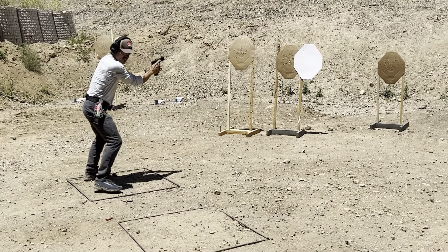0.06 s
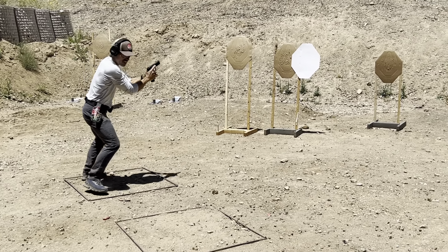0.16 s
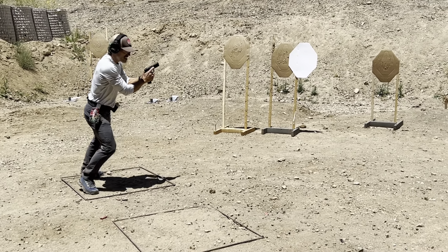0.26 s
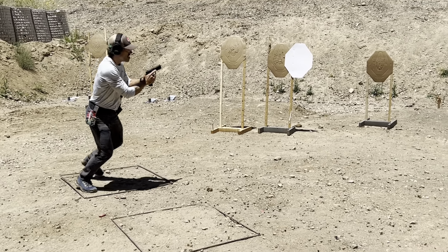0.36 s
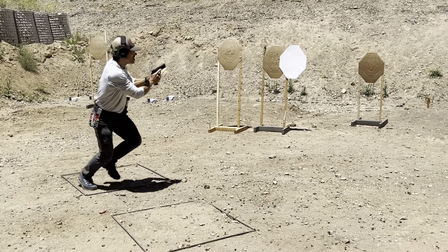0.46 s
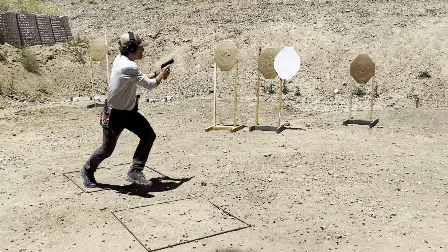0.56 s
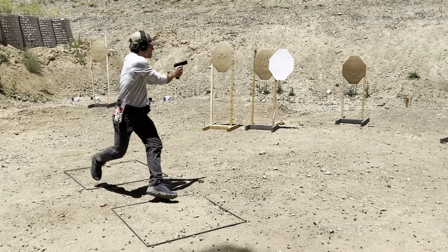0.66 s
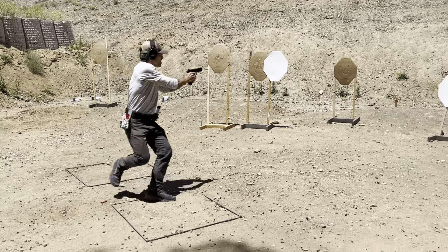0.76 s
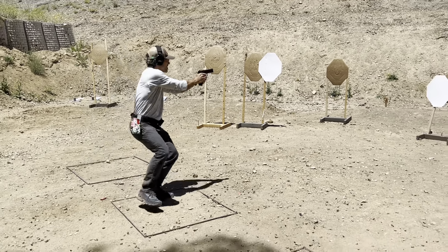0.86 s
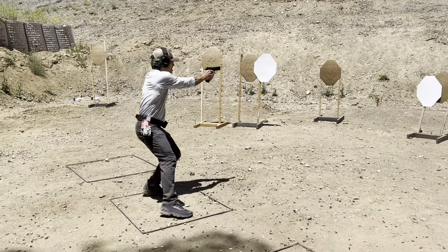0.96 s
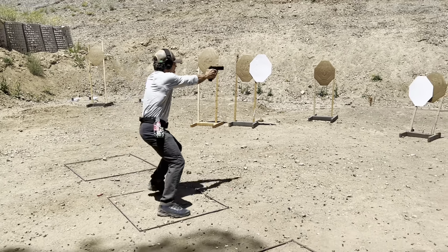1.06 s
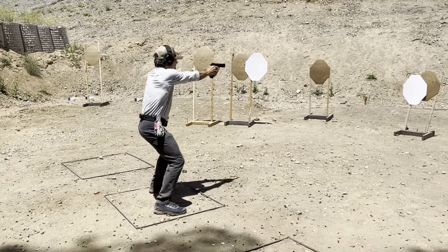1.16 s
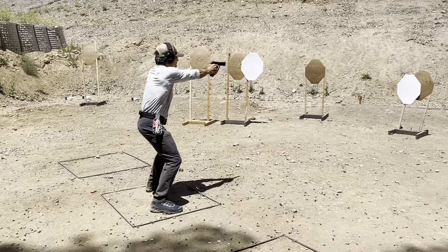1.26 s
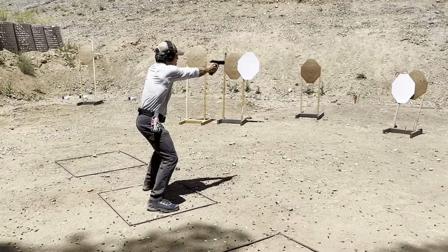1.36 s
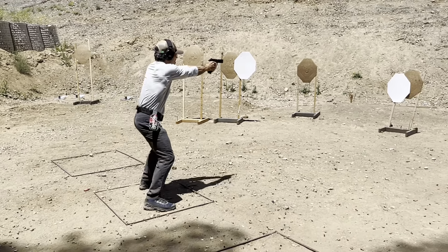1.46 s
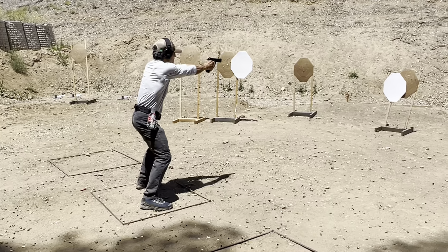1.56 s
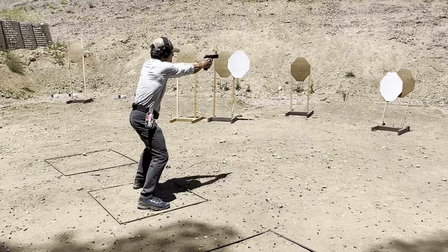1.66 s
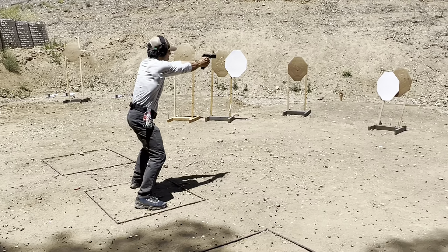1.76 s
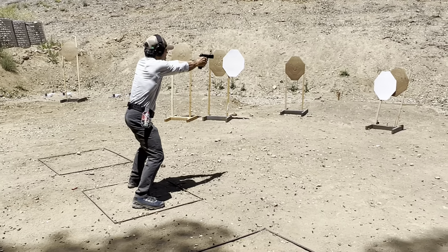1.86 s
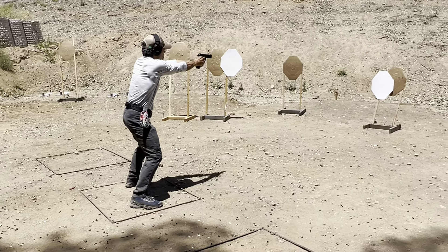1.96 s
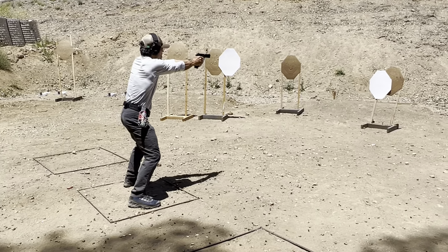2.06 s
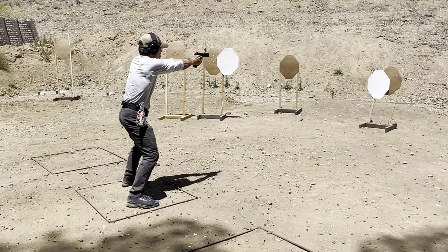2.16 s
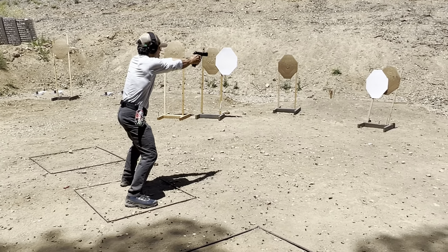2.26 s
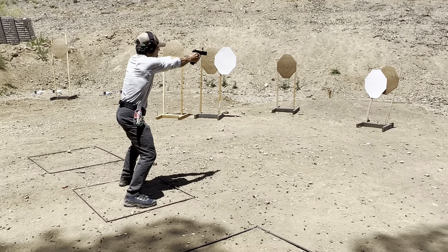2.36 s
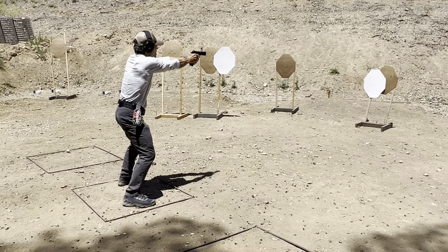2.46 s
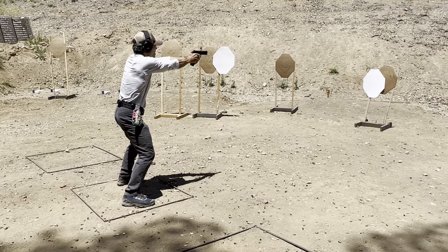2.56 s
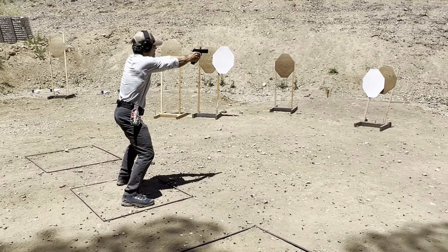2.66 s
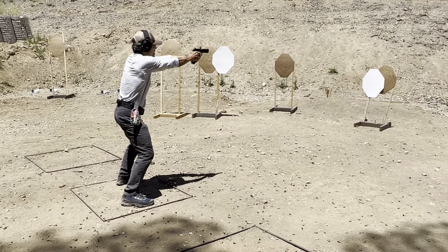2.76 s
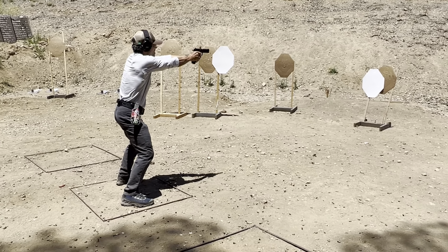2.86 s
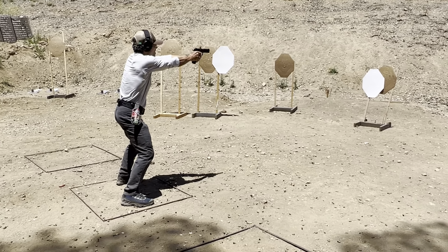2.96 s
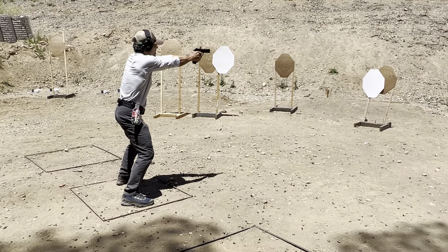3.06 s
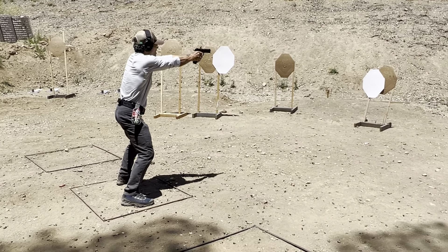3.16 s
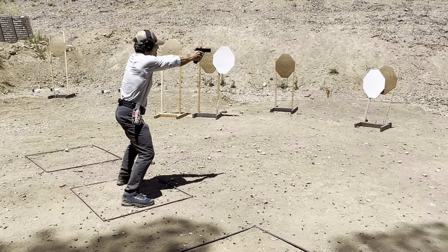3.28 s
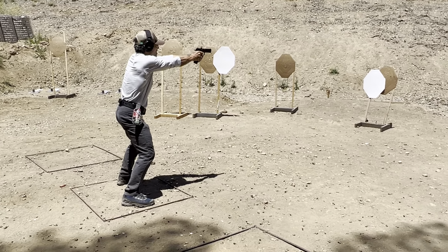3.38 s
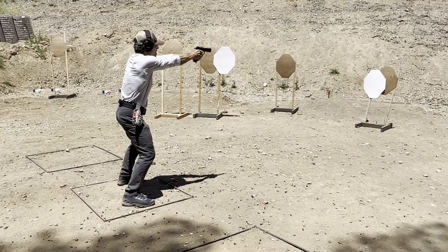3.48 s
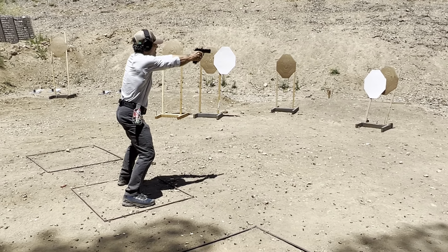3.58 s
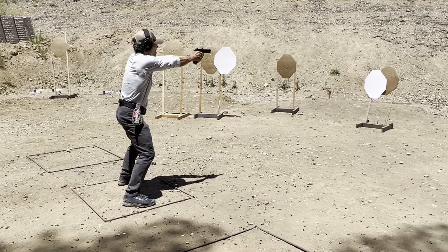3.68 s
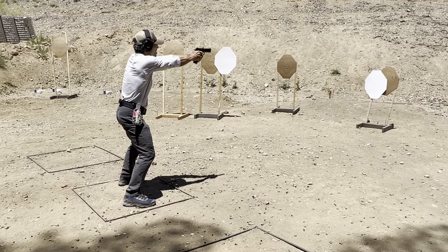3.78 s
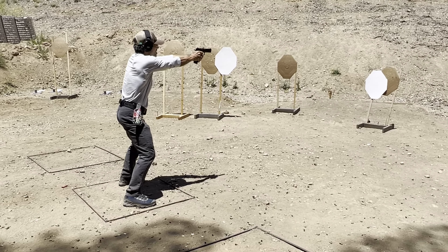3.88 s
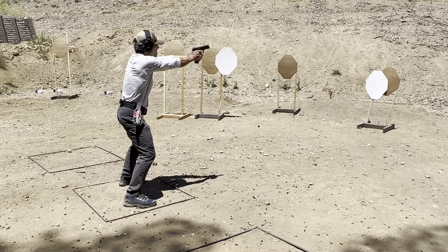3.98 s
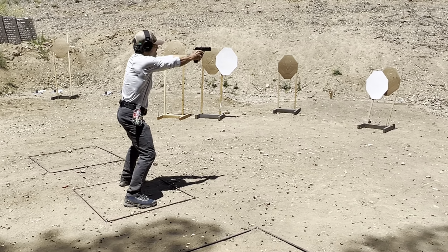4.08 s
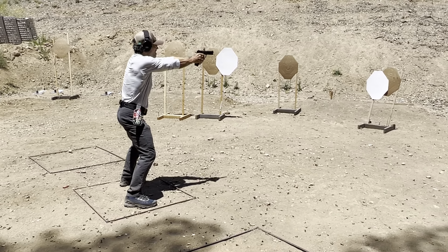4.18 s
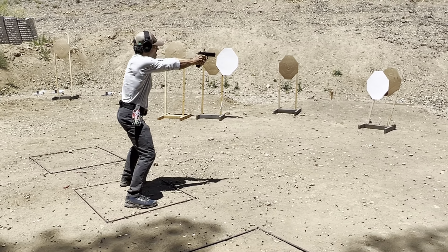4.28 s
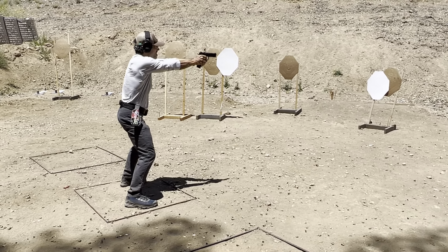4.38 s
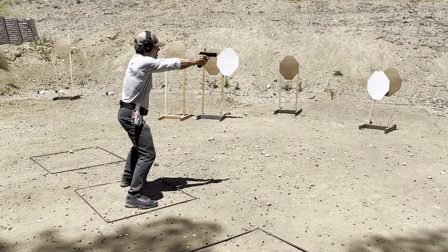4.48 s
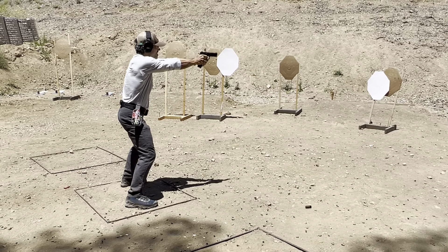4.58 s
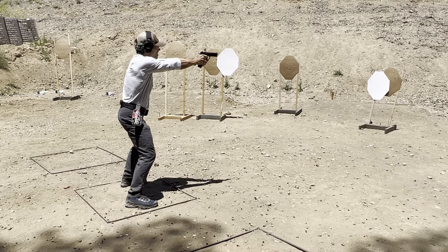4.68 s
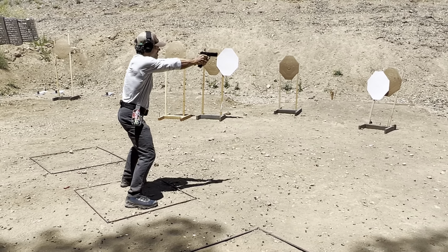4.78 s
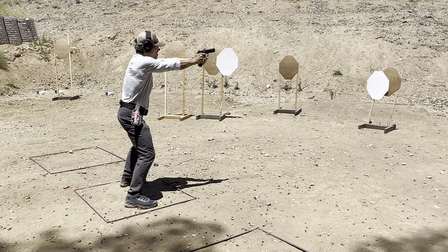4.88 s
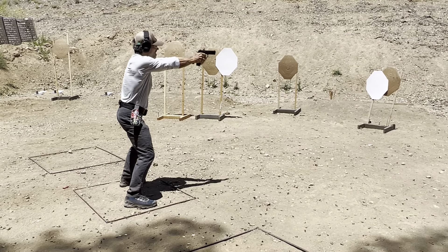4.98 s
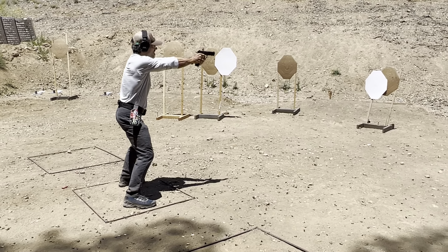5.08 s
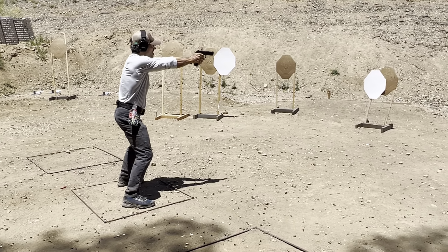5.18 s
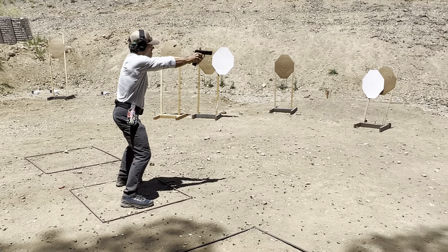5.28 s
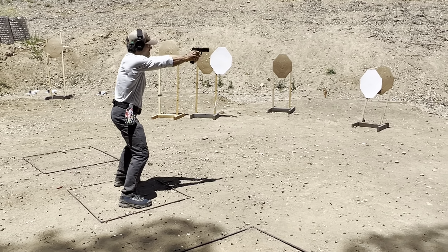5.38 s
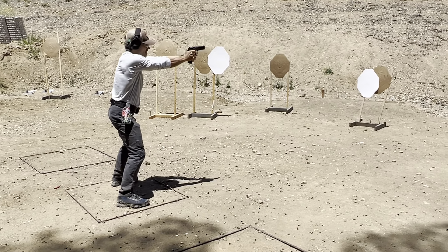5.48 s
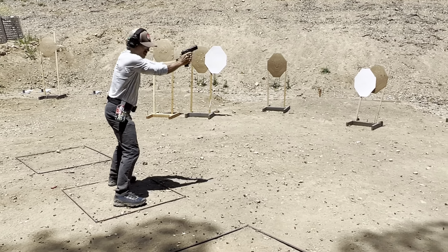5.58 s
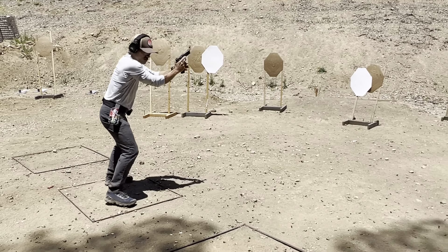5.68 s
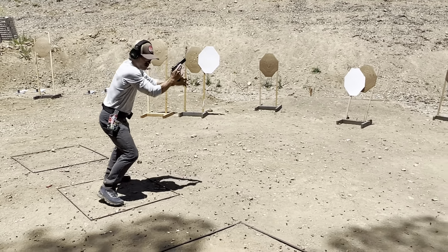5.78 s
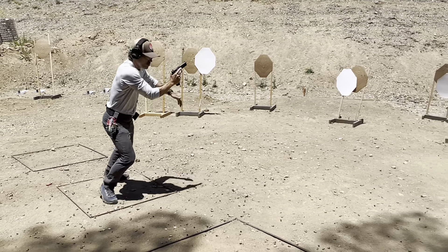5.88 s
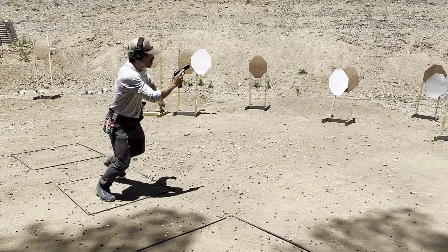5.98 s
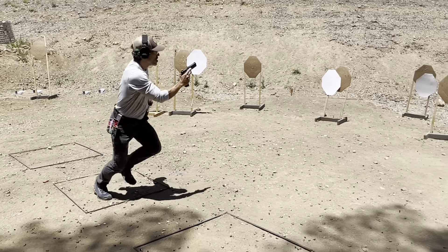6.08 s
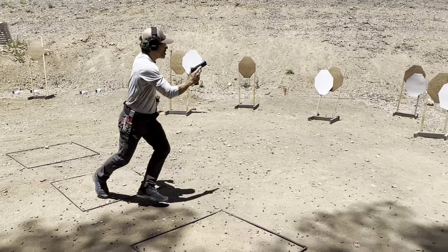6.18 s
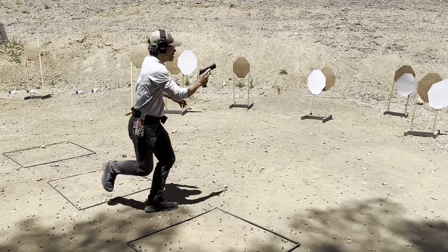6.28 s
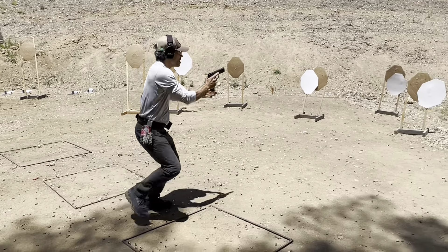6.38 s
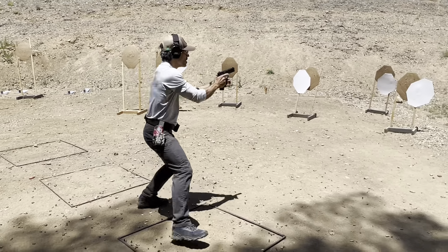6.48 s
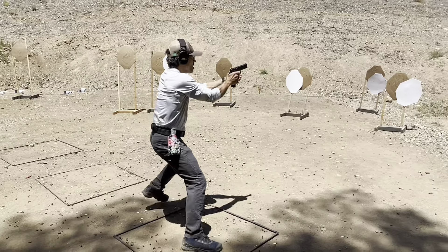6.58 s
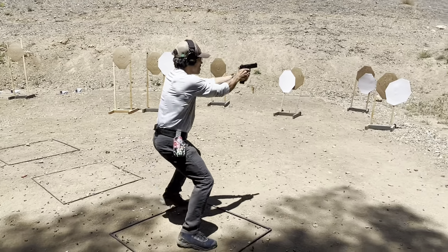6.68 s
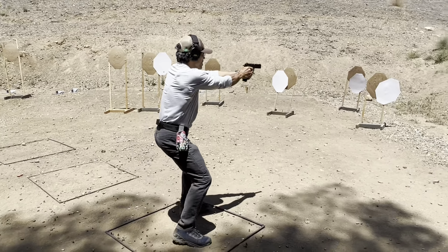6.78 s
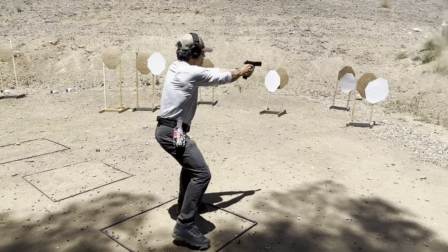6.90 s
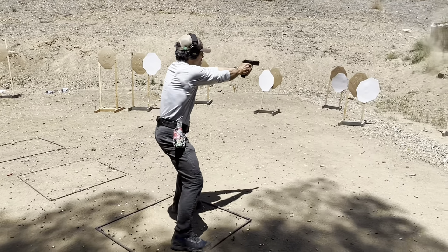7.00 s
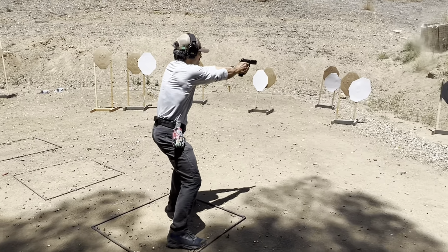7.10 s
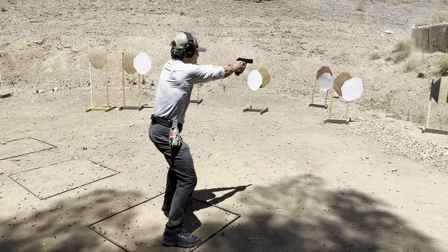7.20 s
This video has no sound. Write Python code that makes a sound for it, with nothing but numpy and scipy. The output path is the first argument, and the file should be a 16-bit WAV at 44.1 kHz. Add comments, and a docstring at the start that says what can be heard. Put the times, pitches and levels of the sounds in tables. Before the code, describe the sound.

A pistol fires three spaced pairs of sharp, overloaded cracks in a dirt shooting bay, with short echoes, gravel footsteps and faint distant shots.

```python
"""A distant gun pops and shoes scuff gravel in a breeze; then a pistol close by fires three pairs of shots.
Each shot is a crack and an overloaded ring of sines and noise, with a boom that slides down in pitch.
Earth banks return it as bursts of noise and low thumps, and the bay rolls on as fading, lumpy noise.
Spent cases tick and ring as sines; steps, far shots and wind are coloured noise under moving levels."""
import sys
import numpy as np
from scipy import signal
from scipy.fft import rfft, irfft, next_fast_len
from scipy.io import wavfile
from scipy.ndimage import map_coordinates

SR = 44100
rng = np.random.default_rng(int(sys.argv[2]) if len(sys.argv) > 2 else 0)


def generate_wav(signal):
    """Clip the signal to [-1, 1] and save it as 16-bit WAV at the path in sys.argv[1]."""
    frames = np.transpose(np.atleast_2d(signal))
    scaled = np.clip(frames, -1, 1) * 32767
    pcm = np.round(scaled).astype(np.int16)
    wavfile.write(sys.argv[1], SR, pcm)


N = 319284
T = np.arange(3 * SR // 2) / SR  # one and a half seconds of time
LAG = .0004  # seconds by which the left microphone port hears the bay after the right

# The pistol shots. Each row: start in seconds, blast level in dB, boom level in dB,
# time for the boom to reach its peak in seconds, tail level in dB, bay rumble level in dB.
SHOT_LIST = [(1.6512, -5, -14.5, .0045, -24.5, -33.5), (2.3171, -7, -15.5, 0.0046, -25.5, -25),
             (3.4322, -6, -15, 0.011, -26, -25.5), (3.9902, -8, -19.5, 0.0029, -27, -23.5),
             (4.882, -6, -20.5, 0.006, -27, -27), (5.3623, -7, -14, 0.0048, -28, -26)]


def amp(db):
    """Turn decibels into gain."""
    return 10 ** (np.asarray(db) / 20)


def unit(x):
    """Scale a sound to an average strength (rms) of 1."""
    return x / np.sqrt(np.mean(x ** 2) + 1e-20)


def along(points, hz):
    """Read a curve of (Hz, value) points, with pitch on a log axis."""
    f, v = np.transpose(points)
    return np.interp(np.log(hz + 1), np.log(f + 1), v)


def filtered(x, response):
    """Multiply the spectrum of x by a response that depends on frequency."""
    n = x.shape[-1]
    m = next_fast_len(n + 4096)
    return irfft(rfft(x, m) * response(np.fft.rfftfreq(m, 1 / SR)), m)[..., :n]


def add(track, s, sound):
    """Mix a sound into the track from time s on, cutting what falls outside."""
    start = round(s * SR)
    sound = sound[..., max(-start, 0):max(N - start, 0)]
    first = max(start, 0)
    track[:, first:first + sound.shape[-1]] += sound


def noise(spectrum, n):
    """Coloured stereo noise of rms 1, near mono in the deepest bass."""
    # Each row: frequency in Hz, likeness of left and right (1 is identical).
    likeness = [(60, 1), (150, 0.46), (450, 0.66), (900, 0.23), (2500, 0.13), (14000, 0.44)]

    def mid_and_side(hz):
        turn = np.arccos(np.clip(along(likeness, hz), -1, 1)) / 2
        return amp(along(spectrum, hz)) * [np.cos(turn), np.sin(turn)]

    mid, side = filtered(rng.standard_normal((2, n)), mid_and_side)
    return unit(np.array([mid + side, mid - side]))


def wobble(rate, n):
    """A smooth random curve through `rate` random points a second."""
    knots = rng.standard_normal(int(n * rate / SR) + 4)
    return map_coordinates(knots, [np.arange(n) * rate / SR])


def burst(spectrum, shape):
    """Noise under an envelope, with the envelope's energy."""
    return unit(noise(spectrum, len(shape)) * shape) * np.sqrt(np.mean(shape ** 2))


def swell(t, delay, rise):
    """A smooth step from 0 to 1, starting at delay."""
    return 1 - np.exp(-(np.maximum(t - delay, 0) / rise) ** 2)


def ported(x, lag):
    """Delay the left channel against the right."""
    return filtered(x, lambda hz: np.exp(np.outer([-1, 1], 1j * np.pi * hz * lag)))


def tail(spectrum, t60, lumpy_db, lump_rate):
    """Echoes from rough ground: lumpy noise in which each pitch takes its own time to fade by 60 dB."""
    hz, t, z = signal.stft(noise(spectrum, len(T)), SR, nperseg=512)
    z = z * amp(-60 * t / along(t60, hz)[:, None])
    fading = signal.istft(z, SR, nperseg=512)[1][:, :len(T)]
    return fading * amp(lumpy_db * wobble(lump_rate, len(T)))


def pistol():
    """Each shot pushes out a blast and a boom, then the banks and the whole bay answer."""
    out = np.zeros((2, N))
    for s, blast_db, boom_db, boom_peak, tail_db, rumble_db in SHOT_LIST:
        direct = blast(hold=0.0057, ring_db=-0.5, hiss_db=-5.0, crack_db=-3.5,
                       crack_length=0.00091, drive_db=-4)
        add(out, s - .0007, amp(blast_db) * direct)
        boom = thump(520, length=boom_peak, end_hz=22.4, glide=.0026, spread=0.19)
        add(out, s + .0032, amp(boom_db) * boom)
        add_bay_tail(out, s, tail_db)
        add(out, s, amp(rumble_db) * rumble())
    add_bank_slaps(out)
    return out


def blast(hold, ring_db, hiss_db, crack_db, crack_length, drive_db):
    """A sharp crack, then a few milliseconds of saturated ringing from the overloaded microphone."""
    # The microphone's ringing notes. Each row: frequency in Hz, level in dB.
    ring_modes = [(370, -4), (570, -9), (900, -0.5), (1380, -7.5), (2165, -10), (2850, -13), (5450, -17)]
    # Colour of the hiss. Each row: frequency in Hz, relative level in dB.
    hiss_colour = [(200, -9.5), (1000, -3.5), (1500, -0.5), (1800, -3.5), (2250, 1.5), (3400, -9.5),
                   (5650, -11), (8300, -14), (10200, -28), (12500, -16), (14200, -15.5), (16500, -24)]
    # Balance of ring and hiss. Each row: frequency in Hz, left over right in dB.
    left_lean = [(200, 1), (500, 5.5), (900, 5), (2500, 5), (5000, 1), (14000, -2.5)]
    t = T[:SR // 20]
    shape = swell(t, 0.00023, 0.0012) * np.exp(-(t / hold) ** 6)  # the overload ends abruptly
    ring = 0
    for hz, db in ring_modes:
        # every shot excites the modes a little differently
        level = amp(db + rng.normal(0, 1.3))
        pitch = hz * rng.normal(1, 0.033)
        phase = rng.random() + rng.normal(0, 0.13, (2, 1))  # in cycles, slightly apart at the ports
        ring = ring + level * np.sin(2 * np.pi * (pitch * t + phase))
    body = amp(ring_db) * ring * shape + amp(hiss_db) * burst(hiss_colour, shape)
    body = np.tanh(amp(drive_db) * body) / amp(drive_db)
    body = ported(body, LAG / 2)
    body = filtered(body, lambda hz: amp(np.outer([1, -1], along(left_lean, hz)) / 2))
    crack_colour = [(3000, -16.5), (8000, -4), (10300, -14.0), (13000, 2.0), (16000, -1.0)]
    crack = burst(crack_colour, swell(t, 0, 0.00041) * np.exp(-(t / crack_length) ** 2))
    return body + amp(crack_db) * (crack + crack[0]) / 2  # the crack leans towards mono


def thump(start_hz, length, end_hz, glide, spread):
    """A low pressure wave whose deepest part arrives last, a little out of step at the two ports."""
    t = T[:SR // 5]
    cycles = end_hz * t + (start_hz - end_hz) * glide * np.log1p(t / glide)
    skew = spread * np.array([[-1], [1]])  # radians
    envelope = np.sqrt(t / length * np.exp(1 - t / length))  # strongest at t = length
    return np.sin(2 * np.pi * cycles + skew) * envelope


def add_bank_slaps(out):
    """Three earth banks throw each blast back, each in its own colour and in any order."""
    # One row for each shot: first slap's delay in seconds and level in dB, then the same pair for
    # the second and the third slap. The first slap's level is before a 2.5 dB cut.
    bank_echoes = [(.0240, -16, 0.025, -23.5, 0.017, -26.5), (0.022, -12.5, 0.034, -27, .048, -15.5),
                   (0.027, -12, 0.021, -18.5, 0.037, -14.5), (.0245, -9, .038, -15, .048, -14.5),
                   (0.0253, -12, .036, -19.5, 0.036, -15), (.0250, -8, .037, -17.5, .046, -13)]
    # Colours of the first, second and third slap. Each row: frequency in Hz, relative level in dB.
    first_colour = [(120, -29.5), (200, -1.5), (485, -7), (961, 0.5), (2160, -14), (3310, -23), (5450, -21),
                    (8030, -29), (8970, -29.5), (9840, -46), (12300, -29), (14800, -28.5), (16500, -47)]
    second_colour = [(180, -34), (300, -4), (1020, -8), (1580, -14), (2400, -11.5), (4240, -23),
                     (6030, -18.5), (10500, -42.5), (12400, -31), (14900, -35), (16500, -51)]
    third_colour = [(120, -32), (200, -2), (306, -9.5), (573, 4), (1160, -11.5), (3250, -22.5), (3630, -21),
                    (4290, -30.5), (5870, -25.5), (10000, -45.5), (13200, -41), (15300, -44), (16500, -64)]
    for (s, *_), echoes in zip(SHOT_LIST, bank_echoes):
        delay_1, db_1, delay_2, db_2, delay_3, db_3 = echoes
        first_slap = slap(first_colour, face_t60=0.039, rubble_db=-9.5, rubble_t60=0.21)
        add(out, s + delay_1, amp(db_1 - 2.5) * first_slap)
        second_slap = slap(second_colour, face_t60=.02, rubble_db=-14.5, rubble_t60=0.068)
        add(out, s + delay_2, amp(db_2) * second_slap)
        third_slap = slap(third_colour, face_t60=.04, rubble_db=-10.0, rubble_t60=0.12)
        add(out, s + delay_3, amp(db_3) * third_slap)


def slap(spectrum, face_t60, rubble_db, rubble_t60):
    """An earth bank answers with one hard return and a short spray from its rubble."""
    t = T[:SR // 5]
    face = amp(-60 * t / face_t60)
    rubble = amp(rubble_db - 60 * t / rubble_t60)
    answer = burst(spectrum, swell(t, 0, 0.00064) * (face + rubble))
    return ported(answer, LAG) * amp([[.8], [-.8]])  # left a little louder


def add_bay_tail(out, s, tail_db):
    """Rough ground scatters the shot, a long roll builds up, and farther slopes answer later."""
    # Colours of scatter, roll and late answers. Each row: frequency in Hz, relative level in dB.
    scatter_colour = [(47, -31), (80, -4), (125, -11), (249, -21.5), (795, -12), (1740, -22.5), (2420, -17),
                      (2770, -26.5), (6190, -34), (8450, -45.5), (9880, -58), (13800, -32), (15400, -52),
                      (16500, -75)]
    roll_colour = [(47, -28), (80, 0.5), (134, -9.5), (257, -13), (319, -6), (464, -9), (1130, -10),
                   (1400, -19), (2170, -16), (5180, -37), (9000, -58), (11700, -84.5), (19800, -120)]
    late_colour = [(40, -19), (80, -3.5), (250, -11.5), (800, -10.5), (2200, -20), (6000, -34.5),
                   (9000, -59), (13000, -49)]
    # Fading of scatter and roll. Each row: frequency in Hz, time to fall by 60 dB in seconds.
    scatter_fade = [(100, 0.43), (1000, 0.29), (5000, 0.36), (8500, 0.37), (13000, 0.14)]
    roll_fade = [(100, 1.1), (1000, 1.28), (2500, 1.153), (5000, 1.1), (9000, 0.85)]
    # the ground scatters first; the slopes join in a moment later
    build_up = amp(1.5) * swell(T, 0.0038, 0.00091) + swell(T, 0.015, 0.0036)
    scatter = tail(scatter_colour, scatter_fade, lumpy_db=2, lump_rate=180) * build_up
    roll = tail(roll_colour, roll_fade, lumpy_db=2.0, lump_rate=64) * swell(T, 0.024, 0.026)
    add(out, s, amp(tail_db) * (scatter + amp(-10.5) * roll) * amp([[.7], [-.7]]))
    # the back slope and the neighbouring bay answer later: delay s, dB, seconds to fall by 60 dB
    t = T[:SR // 3]
    for delay, db, t60 in [(.106, -3.5, 0.096), (.194, -15, 0.34)]:
        fade = amp(tail_db + db - 60 * t / t60 + 2 * wobble(180, len(t)))
        add(out, s + delay, fade * swell(t, 0, 0.0017) * noise(late_colour, len(t)))


def rumble():
    """The bay hums briefly and unevenly at its deepest note."""
    drift = 0.11 * wobble(3.1, len(T))  # in cycles
    life = amp(-60 * T / .9 + 2.5 * wobble(14, len(T)))
    life = life * swell(T, .008, .02) * np.exp(-(T / .45) ** 6)
    return life * np.sin(2 * np.pi * (55 * T + drift))


def low_echoes():
    """Every shot comes back as three low thumps, a few weaker strays and a last faint thud."""
    # One row for each shot: delays of its three thumps, in seconds.
    echo_delays = [(.027, .225, .189), (.046, .227, .190), (.045, .196, .074), (.042, .194, .245),
                   (.020, .265, .161), (.026, .201, .119)]
    # One row for each shot: levels of its three thumps, in dB.
    echo_levels = [(-27, -22, -28), (-28, -20, -25), (-20.5, -25.5, -21.5), (-16.5, -21.5, -25.5),
                   (-16, -33, -28), (-8.5, -30, -28.5)]
    # One row for each of the three: starting pitch in Hz, time to the thump's peak in seconds,
    # level in dB of the slap at its front.
    echo_shapes = [(350, 0.015, -9.5), (616, 0.0066, -10), (280, .008, -4.5)]
    stray_db, stray_from_s, stray_to_s = -35, 0.08, .24  # strays come at chance times in this range
    hill_s, hill_db = .335, -47.5  # a distant hill answers last
    out = np.zeros((2, N))
    for (s, *_), delays, levels in zip(SHOT_LIST, echo_delays, echo_levels):
        for delay, db, (hz, length, front_db) in zip(delays, levels, echo_shapes):
            add(out, s + delay, amp(db) * low_echo(hz, length, front_db))
        for chance in rng.random(size=3):
            delay = stray_from_s + chance * (stray_to_s - stray_from_s)
            add(out, s + delay, amp(stray_db) * low_echo(hz=429.4, length=0.0083, front_db=-3))
        add(out, s + hill_s, amp(hill_db) * low_echo(hz=465, length=0.0039, front_db=-8.5))
    return out


def low_echo(hz, length, front_db):
    """A slope returns mostly the bass of a blast, with a muffled slap at its front."""
    muffled = [(150, -8.5), (550, 1.5), (850, -7), (2500, -23), (8000, -58)]
    front = slap(muffled, face_t60=0.015, rubble_db=-14, rubble_t60=.09)
    brief = np.exp(-(T[:SR // 5] / 0.1) ** 4)
    return amp(front_db) * front + brief * thump(hz, length, end_hz=25, glide=.0021, spread=0.23)


def cases():
    """A brass case ticks on a stone and rings with one high note."""
    # Cases landing. Each row: start in seconds, tick level in dB, ring level in dB.
    landings = [(.695, -67, -67), (3.282, -80.5, -74), (4.243, -46, -59), (4.808, -51, -74),
                (5.695, -50.5, -81), (5.9707, -46, -72), (6.1439, -51, -68)]
    case_hz = 10920
    tick_colour = [(1000, 3.5), (6000, -19), (9500, -14), (11500, -4.5), (15500, -9)]
    out, t = np.zeros((2, N)), T[:SR // 2]
    for s, tick_db, ring_db in landings:
        tick = burst(tick_colour, amp(-60 * t / 0.021))
        ring = amp(ring_db - 60 * t / 0.18) * np.sin(2 * np.pi * case_hz * t)
        add(out, s, amp(tick_db) * tick + ring)
    return out


def footwork():
    """Heel, then ball, grind over loose stones; soles and gear knock and click."""
    # Footfalls and pivots. Each row: start in seconds, level in dB, length in seconds.
    steps = [(.349, -61, 0.02), (.43, -70.5, .11), (0.721, -63, 0.029), (1.267, -71, .075),
             (2.12, -63, 0.031), (2.9, -67, 0.069), (3.096, -57.5, 0.079), (6.056, -69, 0.029),
             (6.262, -61, 0.05), (6.553, -57.5, .1), (6.763, -70, 0.041), (6.833, -61, 0.077)]
    # Short knocks of soles and gear. Each row: start in seconds, level in dB, pitch in Hz.
    knocks = [(.03, -52, 480), (.431, -60.5, 302), (4.732, -61, 647), (6.056, -52.5, 900), (6.6, -56, 324),
              (6.988, -47, 807), (7.012, -50, 840), (7.067, -54, 847)]
    # Dry clicks of stones and gear. Each row: start in seconds, level in dB.
    clicks = [(0.629, -60), (0.694, -52.5), (.857, -62), (1.329, -73), (1.39, -68), (6.9771, -52.5),
              (6.989, -46)]
    # Colours of gravel and click. Each row: frequency in Hz, relative level in dB.
    gravel_colour = [(120, -46), (200, -12), (328, -1.5), (538, -9.5), (916, 1), (1350, -9), (2210, -2.5),
                     (3690, -17.5), (10900, -33.5), (13100, -38), (16000, -35)]
    click_colour = [(300, -16), (1500, 7.5), (3500, -2), (6500, -12), (10000, 2), (12000, -2), (16000, -7)]
    ball_at, ball_db = .52, 0  # the ball follows the heel: share of the step's length, dB over the heel
    out, t = np.zeros((2, N)), T[:SR // 4]

    def press(start, length):
        return swell(t, start, 0.0046) * np.exp(-((t - start) / (0.49 * length)) ** 4)

    for s, db, length in steps:
        grains = amp(4.5 * wobble(700, len(t)) + 2 * wobble(130, len(t)))
        stroke = press(0, length) + amp(ball_db) * press(ball_at * length, length)
        add(out, s, amp(db) * burst(gravel_colour, unit(grains * stroke) * stroke.std()))
    for s, db, hz in knocks:
        colour = [(hz / 2, -16), (hz, 0), (hz * 2.3, -13), (2300, -15), (7000, -34), (12000, -52)]
        add(out, s, amp(db) * burst(colour, swell(t, 0, 0.00045) * amp(-60 * t / 0.063)))
    for s, db in clicks:
        add(out, s, amp(db) * burst(click_colour, amp(-60 * t / 0.02)))
    # kicked grit keeps trickling while the shooter runs: start s, length s
    grit_colour = [(500, -1), (2200, 0.0), (5500, -10.5), (10000, -14.5), (13000, -7), (16000, -16)]
    for s, length in [(.3, 0.62), (5.9, 1.6)]:
        n = round(length * SR)
        grit = unit(amp(6 * wobble(700, n) + 5 * wobble(25, n))) * signal.windows.tukey(n)
        add(out, s, amp(-78.5) * grit * noise(grit_colour, n))
    return out


def other_bays():
    """Distant shots arrive as dull washes with two late echoes; one bullet rings a steel plate."""
    # Shots in other bays. Each row: start in seconds, level in dB.
    far_shots = [(-.03, -46.5), (.12, -57), (0.959, -53.5), (5.937, -53), (7.121, -50)]
    # Colour of a distant wash. Each row: frequency in Hz, relative level in dB.
    wash_colour = [(150, -44), (250, -15), (359, -4.5), (642, -10), (883, 0), (1340, -10.5), (2020, -12),
                   (3500, -28), (8000, -48.5), (10400, -60), (17600, -120)]
    # Notes of the far steel plate. Each row: frequency in Hz, level in dB.
    plate_modes = [(1728, -69.5), (2056, -75)]
    wash_fade = [(300, 0.74), (1500, 0.37), (6000, 1.0)]  # Hz, seconds to fall by 60 dB
    pop_colour = [(200, -30), (400, 10), (950, 6), (2500, -16), (6000, -52)]
    out = np.zeros((2, N))
    for s, db in far_shots:
        for delay, echo_db in [(0, -2), (.048, -5.5), (.135, -20)]:
            wash = tail(wash_colour, wash_fade, lumpy_db=3, lump_rate=140)
            add(out, s + delay, amp(db + echo_db) * swell(T, 0, 0.0053) * wash)
        pop = slap(pop_colour, face_t60=0.074, rubble_db=-12, rubble_t60=0.079)
        add(out, s, amp(db + 1.0) * pop)
    plate = 0
    for hz, db in plate_modes:
        phase = 2 * np.pi * hz * T + 0.74 * wobble(45, len(T))
        plate = plate + amp(db - 60 * T / 1.3) * np.sin(phase)
    add(out, 6.06, plate * swell(T, 0, 0.0088) * amp(1.9 * wobble(40.7, len(T))))
    return out


def breeze():
    """Quiet open air, and a slow breeze whose puffs buffet the microphone."""
    # Slow strength of the breeze. Each row: time in seconds, buffet level in dB.
    wind = [(0, -57.5), (.35, -67.5), (1.25, -74), (1.65, -52.5), (3.1, -70), (5.8, -69.5), (6.3, -81.5),
            (7.24, -71)]
    # Short puffs on the microphone. Each row: time of the peak in seconds, level in dB.
    puff_list = [(.55, -55.5), (.7, -63), (1.117, -48.5), (1.32, -59), (1.46, -56.5)]
    # Colours of buffeting and open air. Each row: frequency in Hz, relative level in dB.
    buffet_colour = [(15, -47), (25, -16.5), (49, -2.5), (101, -0.5), (242, -13.5), (500, -29), (650, -63),
                     (1100, -120)]
    air_colour = [(10, -59.5), (25, -27), (50, -9.5), (110, -0.5), (250, -5.5), (900, -1), (2300, -13),
                  (4000, -20.5), (8000, -27), (10000, -38), (13000, -33), (16000, -39)]
    puff_s = 0.044  # half the length of a puff
    t = np.arange(N) / SR
    steady = amp(np.interp(t, *np.transpose(wind)) + 1.7 * wobble(4.9, N))
    puffs = sum(amp(db) * np.exp(-((t - s) / puff_s) ** 2) for s, db in puff_list)
    air = amp(-75.5 + 0.63 * wobble(1.6, N)) * noise(air_colour, N)
    return (steady + puffs) * noise(buffet_colour, N) + air


def scene():
    """Everything heard in the bay."""
    return pistol() + low_echoes() + cases() + footwork() + other_bays() + breeze()


def record(dry):
    """The two ports differ in colour and share a notch near 10 kHz; peaks saturate; the band ends steeply."""
    # Balance of the microphone ports. Each row: frequency in Hz, left over right in dB.
    port_balance = [(100, 0), (1000, 0.5), (2800, 1), (4500, 7.5), (6500, 8.5), (9000, 0.5), (14000, -1.5)]
    top_hz = 16300

    def port_response(hz):
        notch_db = 12 * np.exp(-((hz - 10100) / 600) ** 2)
        return amp(np.outer([1, -1], along(port_balance, hz)) / 2 - notch_db)

    coloured = filtered(dry, port_response)
    coloured = filtered(coloured, lambda hz: hz ** 3 / np.sqrt(hz ** 6 + 37 ** 6))  # bass roll-off
    clipped = coloured / (1 + np.abs(coloured / .95) ** 6) ** (1 / 6)
    return filtered(clipped, lambda hz: 1 / np.sqrt(1 + (hz / top_hz) ** 120))


dry = scene()
out = record(dry)
generate_wav(out)
```